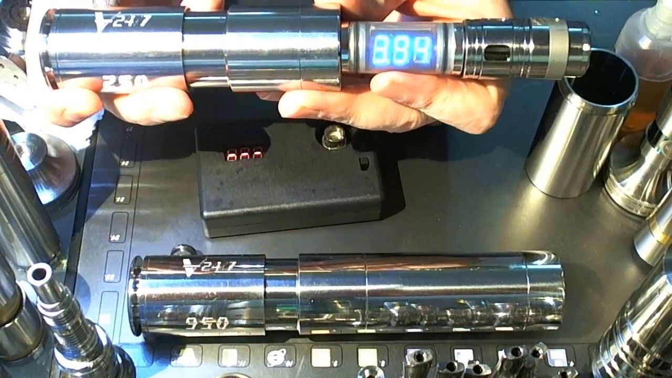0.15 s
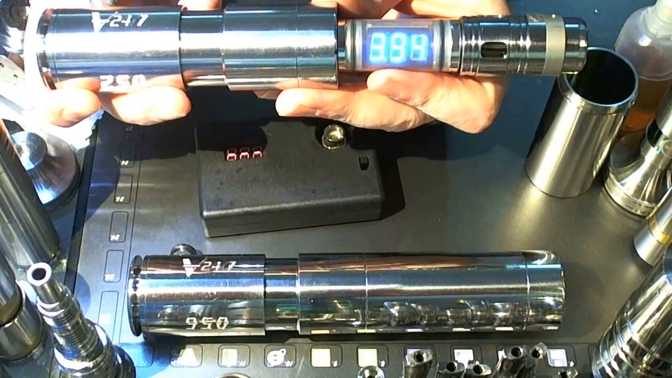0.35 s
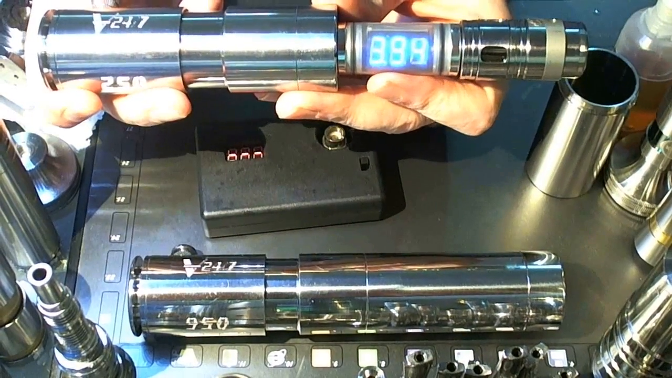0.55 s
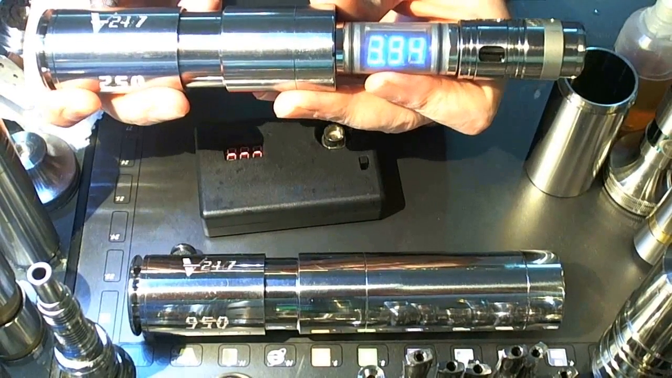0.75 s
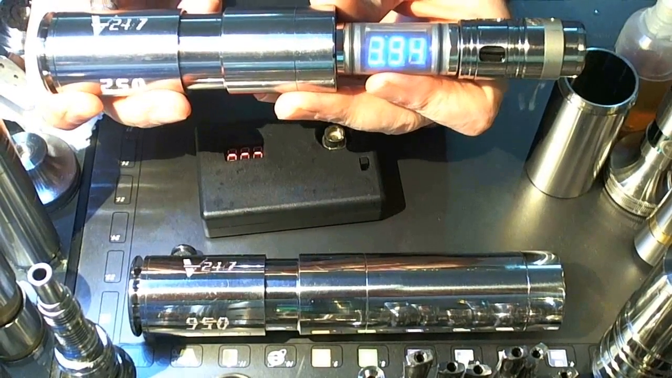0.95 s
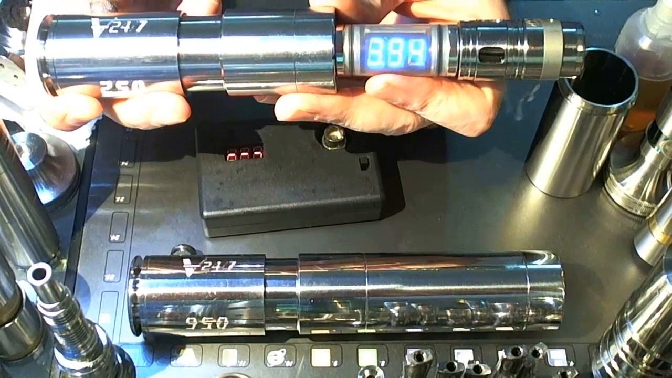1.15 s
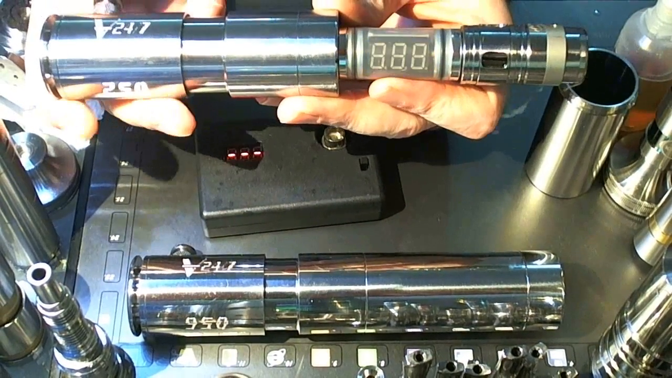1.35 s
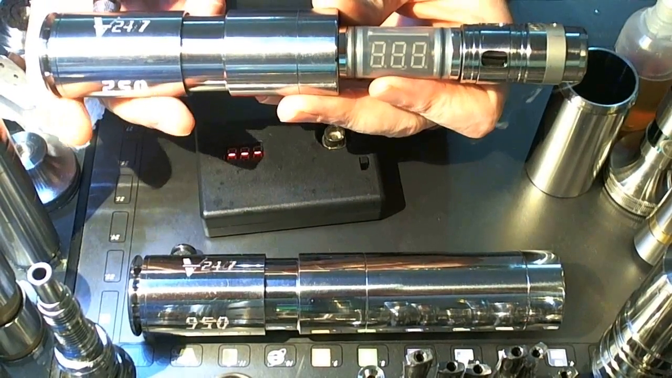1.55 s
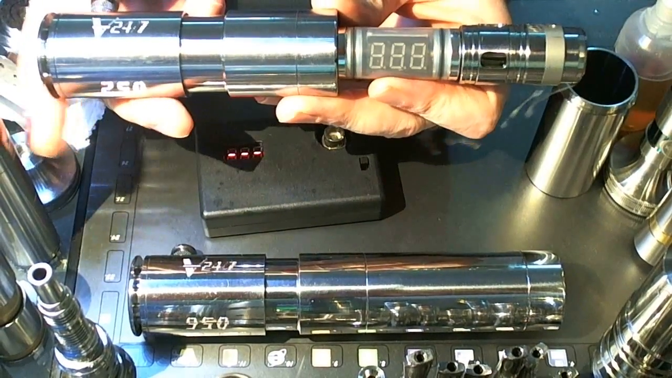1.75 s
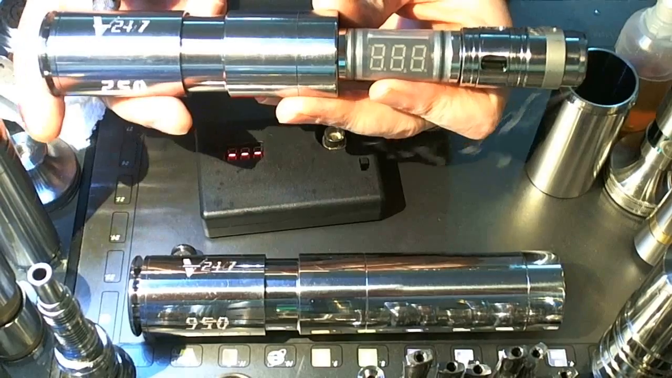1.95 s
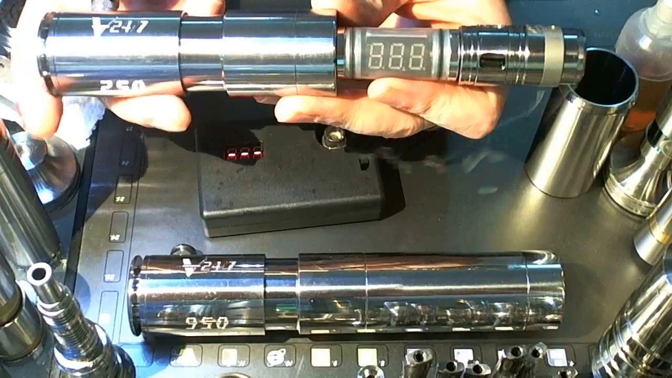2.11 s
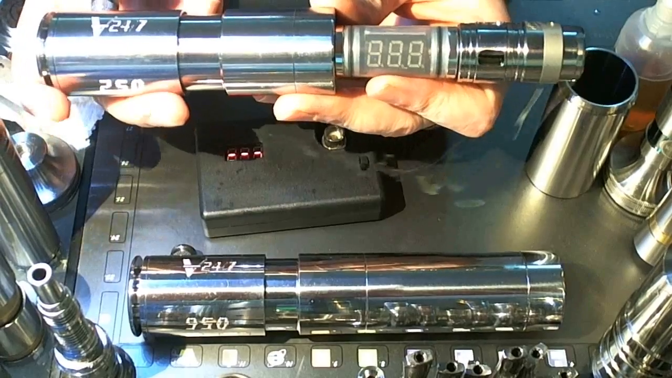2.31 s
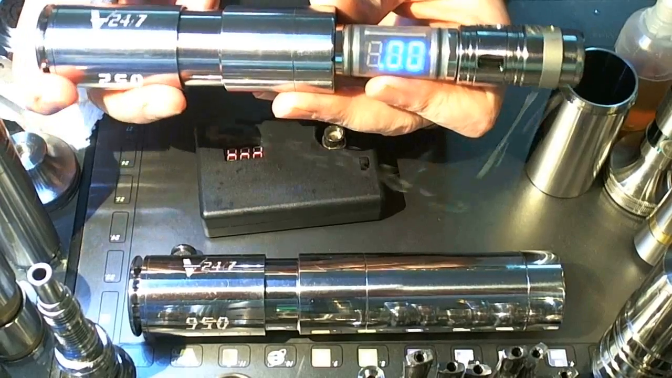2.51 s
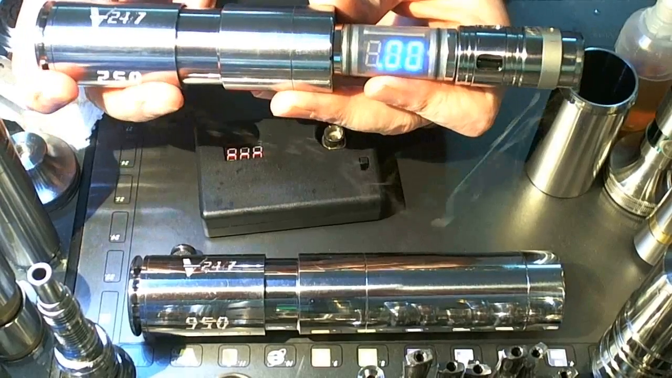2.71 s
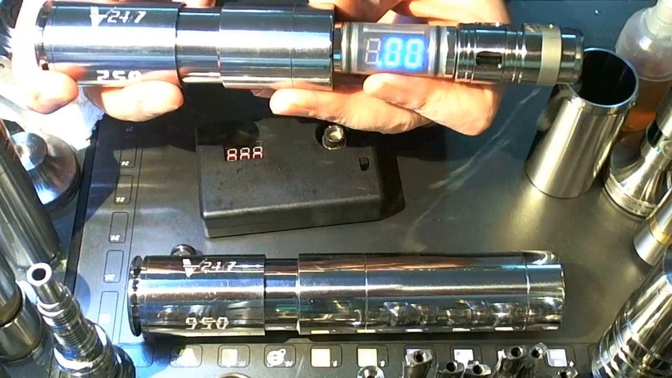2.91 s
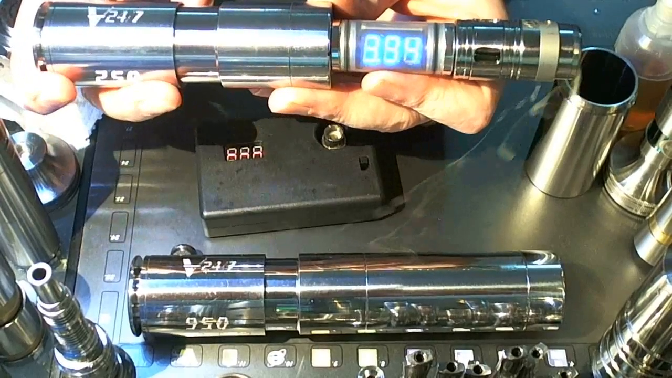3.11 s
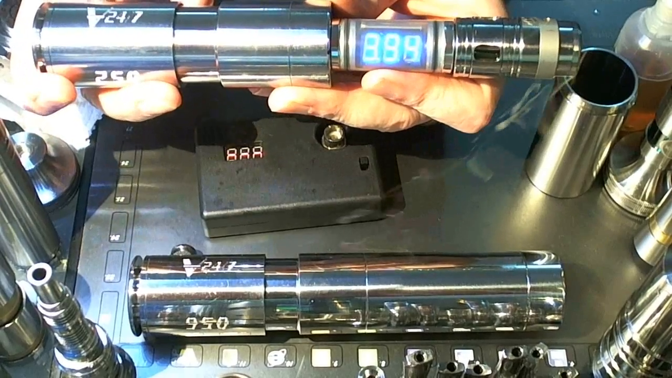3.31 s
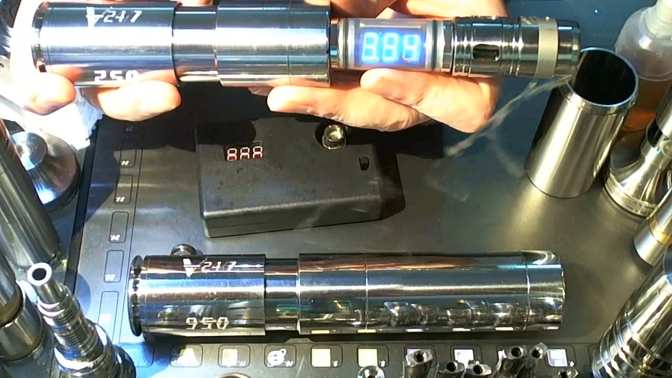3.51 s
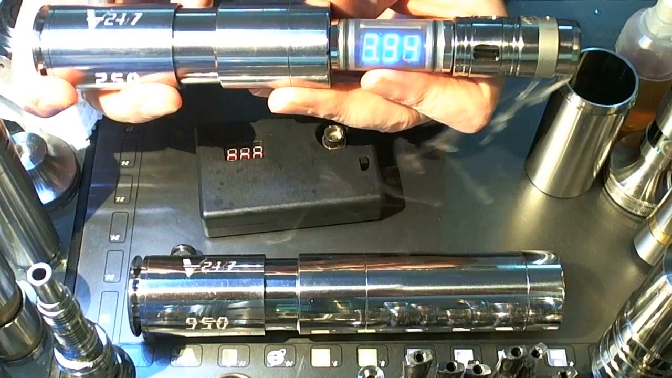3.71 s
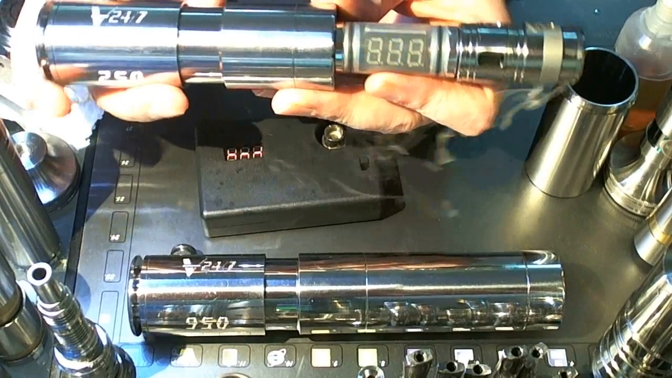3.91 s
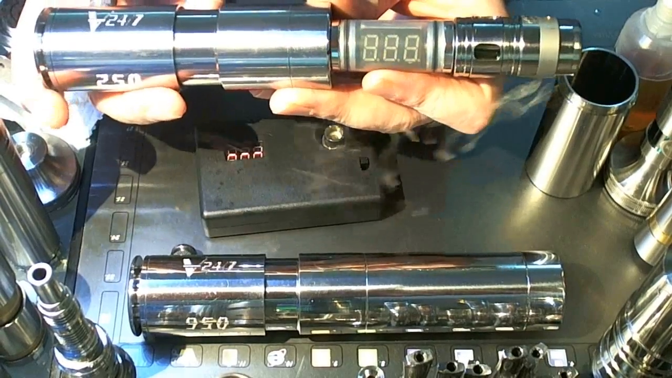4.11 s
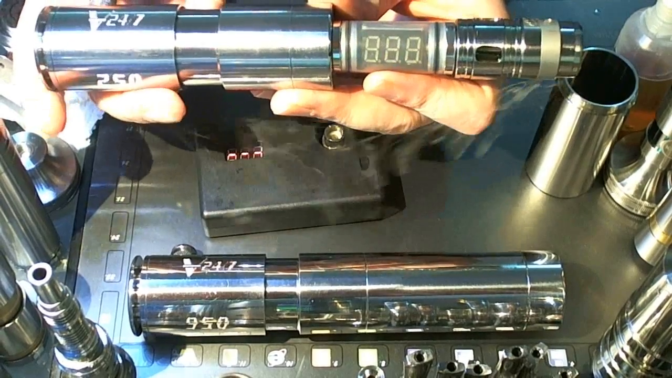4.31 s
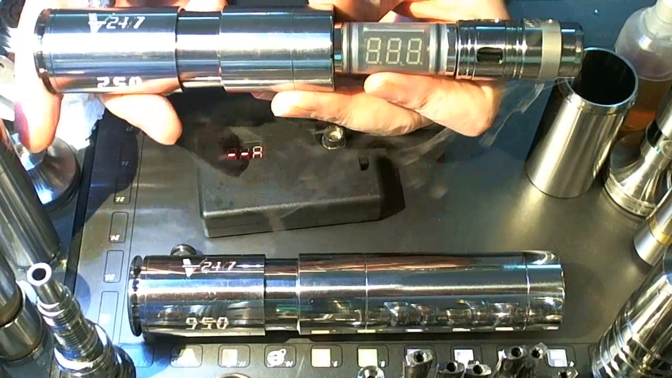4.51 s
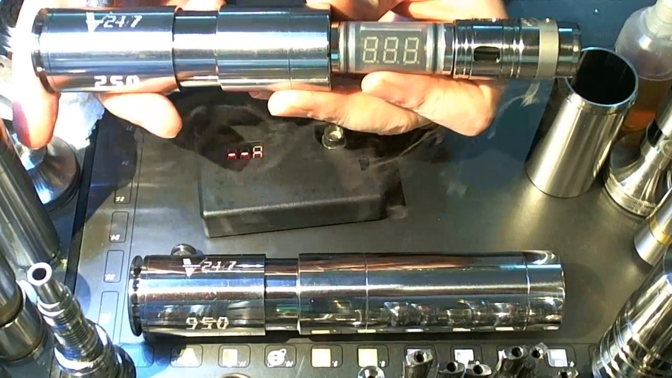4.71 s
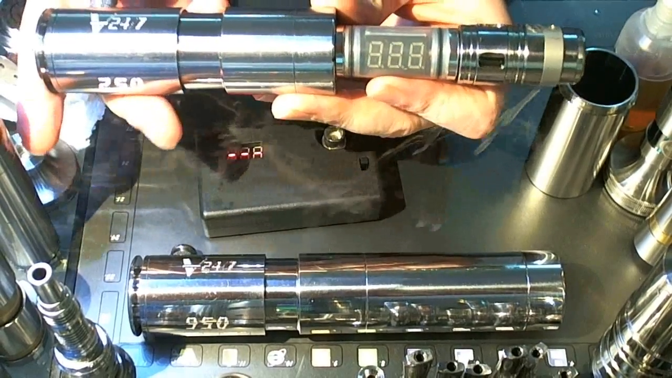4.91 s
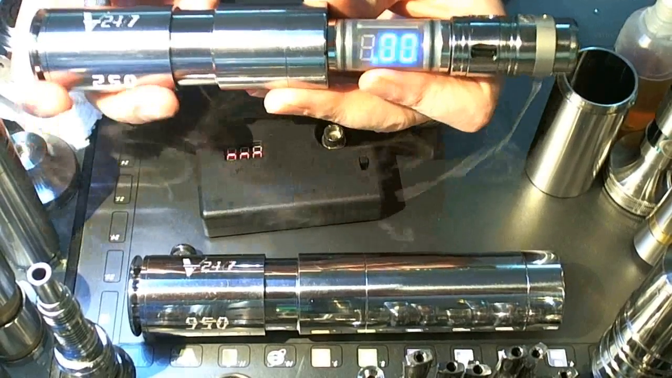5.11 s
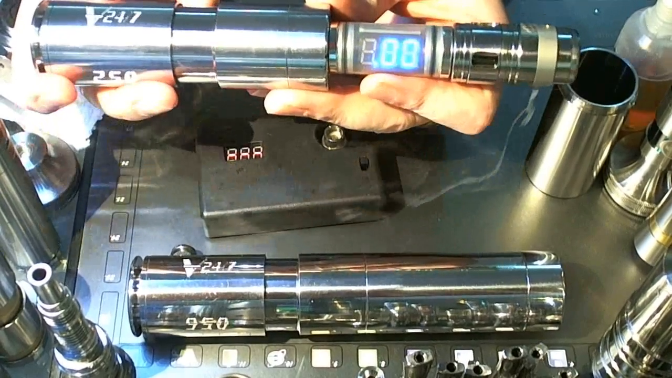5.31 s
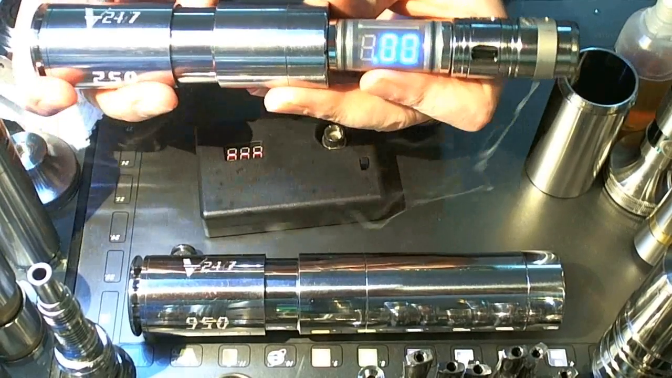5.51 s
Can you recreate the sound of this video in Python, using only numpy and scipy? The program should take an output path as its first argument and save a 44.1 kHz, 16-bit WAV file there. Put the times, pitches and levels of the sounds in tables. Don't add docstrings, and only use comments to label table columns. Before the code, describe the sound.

Very close to a small dull microphone at a desk, a hot coil in a steel tube boils liquid. Already sizzling, it pops sharply for about a second and a half, then dies to stray ticks. A second, wetter burst starts with a violent pop and dull knocks, fades, and a weaker third begins near the end. Soft fan noise and faint low hum lie beneath.

```python
import sys
import numpy as np
from scipy import signal
from scipy.fft import rfft, irfft
from scipy.io import wavfile
from scipy.ndimage import uniform_filter1d, map_coordinates

SR = 44100
rng = np.random.default_rng(int(sys.argv[2]) if len(sys.argv) > 2 else 0)


def persist_wave(psi):
    counts = np.round(np.clip(psi, -1, 1) * 32767).astype(np.int16)
    wavfile.write(sys.argv[1], SR, np.atleast_2d(counts).T)


def how_loud(loudness_db):
    steps = np.asarray(loudness_db, float) / 20
    return 10 ** steps


N = 249341
TIME = np.arange(N) / SR


def unit(x):
    return x / np.sqrt(np.mean(x ** 2))


def walk(rate_hz):
    hold = int(SR / rate_hz)
    steps = rng.standard_normal(N // hold + 1)
    return uniform_filter1d(np.repeat(steps, hold), hold)[:N]


def swing(hz, cycles, t):
    return np.sin(2 * np.pi * hz * t) * np.exp(-t * hz / cycles)


# (frequency [Hz], level [dB per Hz])
FAN = [(20, -16), (95, -16), (340, -6), (620, -3.5), (2200, -6.5), (2800, -12), (6000, -15.5),
       (8490, -25.5)]


def fan(level_db=-44):
    hz, shape_db = np.transpose(FAN)
    bins_hz = np.maximum(np.arange(N // 2 + 1) * SR / N, 1)
    gain = how_loud(np.interp(np.log(bins_hz), np.log(hz), shape_db))
    air = irfft(rfft(rng.standard_normal(N)) * gain, N)
    return how_loud(level_db + 0.26 * walk(2.4)) * unit(air)


# (frequency [Hz], level [dB], share of the motor load followed [0-1])
HUM = [(123, -65, .8), (186, -58, .95), (247, -66, .8), (306, -66, .1), (381, -59, .02)]
# (time [s], level [dB])
MOTOR = [
    (0, -1.5),
    (.42, -3),
    (.55, -12),
    (.8, -8),
    (.88, -2),
    (1.85, -3.5),
    (1.95, -13),
    (2.62, -7),
    (2.72, -28),
]


def hum(sag_share_per_s=.018, waver_share=.003):
    load_db = np.interp(TIME, *np.transpose(MOTOR))
    out = np.zeros(N)
    for hz, level_db, share in HUM:
        line_db = level_db + share * load_db + 1.5 * walk(4.5)
        speed = 1 - share * sag_share_per_s * TIME + waver_share * walk(3)
        out += how_loud(line_db) * np.sin(2 * np.pi * np.cumsum(hz * speed) / SR)
    return np.sqrt(2) * out


# (time [s], peak [dB], pitch [Hz], ring [cycles])
THUMPS = [
    (0.533, -36, 563, 1.8),
    (0.872, -33, 597, 1.8),
    (2.751, -16, 1070, 1.2),
    (2.935, -30, 664, 0.81),
    (2.999, -35.5, 610, 2),
    (3.085, -31, 670, 1.9),
    (3.14, -28.5, 670, 2.5),
    (4.376, -26.5, 726, 1.4),
]


def thumps(lag_s=.0014, crack_db=-3.5, crack_hz=1250, crack_cycles=0.6, leak_hz=190):
    out, t = np.zeros(N + 900), np.arange(900) / SR
    for s, peak_db, hz, cycles in THUMPS:
        knock = swing(hz, cycles, t) + how_loud(crack_db) * swing(crack_hz, crack_cycles, t)
        i = int((s + lag_s) * SR)
        out[i:i + len(t)] += how_loud(peak_db) * knock
    return signal.lfilter(*signal.butter(N=1, Wn=leak_hz, btype="high", fs=SR), out[:N])


# (frequency [Hz], width [Hz], level [dB])
TUBE = [(628, 110, -19.5), (1070, 230, -22.5), (1712, 82, -11.5), (2176, 400, -11), (2657, 136, -2.5),
        (3577, 138, -1), (4207, 750, -12.5), (4790, 1020, -12), (5160, 810, -26.5), (6295, 380, -22)]
# (frequency [Hz], width [Hz])
MAIN = (3183, 340)


def tube(main_db, widen, skirt=1.64):
    hz = np.arange(1025) * SR / 2048
    main_hz, main_width_hz = MAIN
    modes = list(TUBE) + [(main_hz, main_width_hz * widen, main_db)]
    power = sum(how_loud(db) ** 2 / (1 + (2 * (hz - f) / width) ** 2) ** skirt for f, width, db in modes)
    cepstrum = irfft(np.log(power) / 2)
    cepstrum[1:1024] *= 2
    cepstrum[1025:] = 0
    return irfft(np.exp(rfft(cepstrum)))[:900]


# (first [s], last [s])
FLOODED = (2.7, 4.25)


def through_tube(x, bodies):
    dry_body, wet_body = bodies
    first, last = FLOODED
    flooded = (TIME > first) & (TIME < last)
    dry_ring = signal.fftconvolve(x * ~flooded, dry_body)
    wet_ring = signal.fftconvolve(x * flooded, wet_body)
    return (dry_ring + wet_ring)[:N]


# (start [s], release [s], full level [dB], cold start [dB below full])
BOILS = [
    (-.25, 1.427, -29.5, 7.5),
    (2.53, 2.75, -37.5, 16),
    (2.752, 4.034, -28.5, 2.5),
    (4.685, 4.715, -45, 4),
    (5.396, 5.9, -32, 9),
]


def boil_db(warm_up_s=0.46, cool_db_per_s=51.5):
    spells = []
    for start, end, full_db, cold_db in BOILS:
        heated_s = np.clip(TIME, start, end) - start
        warming_db = cold_db * np.exp(-heated_s / warm_up_s)
        cooling_db = cool_db_per_s * np.maximum(TIME - end, 0)
        spells.append(np.where(TIME < start, -120, full_db - warming_db - cooling_db))
    return np.max(spells, axis=0)


def sizzle(bodies, boil, per_second=2500., scatter_db=4.5, clump_db=2.0, surge_db=0.94, hiss=0.53):
    fires = rng.random(N) < per_second / SR
    sign = np.sign(rng.standard_normal(N))
    size = np.minimum(rng.exponential(size=N), 3.5)
    grains = unit(fires * sign * how_loud(scatter_db * size)) + hiss * rng.standard_normal(N)
    grains = grains * how_loud(clump_db * walk(90) + surge_db * walk(18))
    return how_loud(boil) * unit(through_tube(grains, bodies))


def small_bubbles(boil, loud, count=230, over_db=12.0, scatter_db=3.5, hz=3250, dry_spread_hz=85,
                  wet_spread_hz=180, bright_db=-10, colour_db=3.0, lull_s=.012, lull_db=-6.5):
    s = (np.arange(count) + rng.random(count)) * (N - 1) / SR / count
    size, pitch, colour = np.clip(rng.standard_normal((count, 3)).T, -2, 2)
    wet = (s > min(FLOODED)) & (s < max(FLOODED))
    spread_hz = np.where(wet, wet_spread_hz, dry_spread_hz)
    lead_s = np.array(loud)[:, :1] - s
    held_db = lull_db * np.any((lead_s > 0) & (lead_s < lull_s), axis=0)
    peak_db = boil[(s * SR).astype(int)] + held_db + over_db + scatter_db * size
    return list(zip(s, peak_db, hz + spread_hz * pitch, bright_db + colour_db * colour))


# (time [s], peak [dB], bubble pitch [Hz], brightness [dB])
FIRST_PULL = [(0.105, -6.5, 3370, -21.5), (0.1281, -10, 3340, -27), (0.1786, -11.5, 3320, -15),
              (0.2067, -12.5, 3290, -10), (0.2734, -9, 3560, -7), (0.4052, -12, 3360, -20.5),
              (0.535, -8.5, 3440, -0.5), (0.5538, -10, 3460, -19), (0.6552, -3, 3380, -7.5),
              (0.6969, -12.5, 3350, -21), (0.7586, -6, 3310, -19), (0.7947, -12, 3340, -18),
              (0.818, -10.5, 3320, -3.5), (0.8424, -9.5, 3340, -11), (0.8758, -6.5, 3310, -0.5),
              (0.9728, -10, 3250, 3.5), (0.9817, -9.5, 3280, -12), (1.0248, -7, 3250, -8.5),
              (1.0553, -7, 3270, -16), (1.0888, -3.5, 3260, -6), (1.1023, -7.5, 3063, -2.5),
              (1.1405, -4, 3170, -15.5), (1.1541, -13, 3300, -8), (1.2115, -12, 3200, -17),
              (1.2452, -12.5, 3220, -16.5), (1.2595, -12.5, 3310, -7), (1.2905, -7.5, 3310, -7.5),
              (1.3343, -8, 3300, -10.5), (1.338, -9, 3350, -14), (1.3576, -4.5, 3340, -9)]
SECOND_PULL = [(2.753, 1, 3150, -4), (2.8188, -15, 3460, -7), (2.8336, -9.5, 3360, -9.5),
               (2.8523, -5, 3330, -25), (2.9367, 2, 2910, -6.5), (3.001, 0, 3410, -21.5),
               (3.0137, -7, 3270, -14), (3.0868, -4, 2990, -13), (3.124, -7.5, 3240, -9.5),
               (3.1428, -14.5, 3020, -6), (3.1955, -8.5, 3440, -6), (3.2296, -6, 3190, -7.5),
               (3.2371, -9.5, 3360, -9.5), (3.2768, -4, 3100, -12), (3.3767, -5, 2520, -9),
               (3.4, -6.5, 3180, -17), (3.4108, -15.5, 2960, -12), (3.4489, -9, 3210, -7),
               (3.4729, -12.5, 2960, -5), (3.478, -9.5, 3120, -13.5), (3.4892, -10, 3440, -5.5),
               (3.5836, -9, 2960, 1.5), (3.6374, -9.5, 3250, -6), (3.675, -11.5, 3180, -18),
               (3.7489, -10, 2960, -7), (3.7835, -15, 3330, -19), (3.7873, -10.5, 3200, -4),
               (3.876, -8.5, 3190, -8), (3.9426, -12, 3200, -14), (4.022, -10.5, 2500, -24)]
THIRD_PULL = [(5.3961, -6, 3300, -11), (5.4484, -13, 3460, -10), (5.4884, -11.5, 3500, -24),
              (5.498, -22.5, 3300, -11), (5.5052, -20, 3340, -8.5), (5.521, -20, 3240, -10),
              (5.5453, -22, 3460, -7), (5.5502, -18, 3540, -2), (5.564, -19, 3270, -11),
              (5.5897, -25, 3280, -11), (5.6107, -19, 3370, -15), (5.6215, -9, 3450, -16),
              (5.6313, -13, 3280, -16.5), (5.6472, -21, 3280, -11)]
# (time [s], peak [dB], bubble pitch [Hz], brightness [dB])
STRAGGLERS = [(1.4637, -10.5, 3280, -2), (1.4798, -18.5, 3270, 1), (1.522, -16.5, 3280, -18),
              (1.5423, -6.5, 3320, 1), (1.5572, -16, 3130, -17), (1.5763, -18.5, 3240, 2),
              (1.6414, -26, 3120, -2), (1.7468, -14, 3200, -9), (1.7527, -15.5, 3210, -9),
              (1.7819, -19, 3280, -22), (1.8182, -25, 3180, -15), (2.0292, -31, 3360, -10),
              (2.0478, -26.5, 3150, -4), (2.231, -25.5, 3330, -14), (2.5778, -28.5, 4000, -25),
              (2.6643, -29.5, 3380, -1), (2.6867, -31, 3180, -8), (4.039, -12, 3410, -3),
              (4.06, -12.5, 2770, -18), (4.1161, -21, 3280, -12), (4.1435, -15, 3380, -12),
              (4.1672, -16.5, 3150, -6), (4.2077, -15, 2920, -4), (4.2294, -23, 2840, -12),
              (4.273, -28, 3320, -2), (4.3601, -19, 2690, -25), (4.4187, -31, 3380, -6),
              (4.5523, -20, 3210, -5), (4.5576, -31, 2740, -8), (5.295, -28.5, 3820, -4)]


def pops(bodies, boil, dry_cycles=2.13, wet_cycles=0.9, spray_db=-11, snap_hz=4900, snap_cycles=1.45):
    out, t = np.zeros(N + 600), np.arange(600) / SR
    loud = [*FIRST_PULL, *SECOND_PULL, *THIRD_PULL, *STRAGGLERS]
    spray_fade = np.exp(-t / .002)
    snap = swing(snap_hz, snap_cycles, t)
    for s, peak_db, hz, bright_db in loud + small_bubbles(boil, loud):
        wet = int(min(FLOODED) < s < max(FLOODED))
        spray = how_loud(spray_db) * rng.standard_normal(len(t)) * spray_fade
        bubble = swing(hz, [dry_cycles, wet_cycles][wet], t) + spray

        def to_peak(v):
            return v / np.abs(np.convolve(v[:200], bodies[wet][:200])).max()

        i = int(s * SR)
        out[i:i + len(t)] += how_loud(peak_db) * (to_peak(bubble) + how_loud(bright_db) * to_peak(snap))
    return through_tube(out[:N], bodies)


def desk(x, echo_s=0.0021055, echo_db=-9, tail_db=-14, t60_s=0.13):
    t = np.arange(int(.3 * SR)) / SR
    tail = rng.standard_normal(len(t)) * np.exp(-np.log(1000) * t / t60_s) * (t > echo_s)
    response = how_loud(tail_db) * tail / np.sqrt(np.sum(tail ** 2))
    response[0] += 1
    response[int(echo_s * SR)] += how_loud(echo_db)
    return signal.fftconvolve(x, response)[:N]


def scene():
    boil = boil_db()
    flooded = tube(main_db=-3, widen=1.12)
    crackle = pops((tube(main_db=-2.2, widen=0.58), flooded), boil)
    bed = sizzle((tube(main_db=3.0, widen=0.94), flooded), boil)
    room = fan() + hum()
    return (desk(crackle + bed + thumps()) + room)[None]


# (first [s], last [s], period [s])
SLIPS = [(2.7577, 5.2366, .024749), (5.2573, 5.65, .02881)]
JUMPS = np.arange(2.7388, 5.3, .49956)


def clock_slip(x, slip_samples=0.89, jump_samples=0.99):
    drift = np.zeros(N)
    for first, last, period in SLIPS:
        drift += slip_samples * ((TIME - first) / period % 1) * (TIME >= first) * (TIME < last)
    for s in JUMPS:
        drift += jump_samples * (TIME >= s)
    return map_coordinates(x, [np.arange(N) + drift], order=5, mode="nearest")


def roll_off(x):
    return signal.sosfilt(signal.butter(12, 16000, fs=SR, output="sos"), x)


def record(dry, top_hz=6600, ceiling=1.0, hiss_db=-91):
    dull = signal.sosfilt(signal.butter(14, top_hz, fs=SR, output="sos"), dry[0])
    sampled = clock_slip(np.clip(dull, -ceiling, ceiling))
    mix = sampled + how_loud(hiss_db) * rng.standard_normal(N)
    return roll_off(mix[None])


dry = scene()
out = record(dry)
persist_wave(out)
```